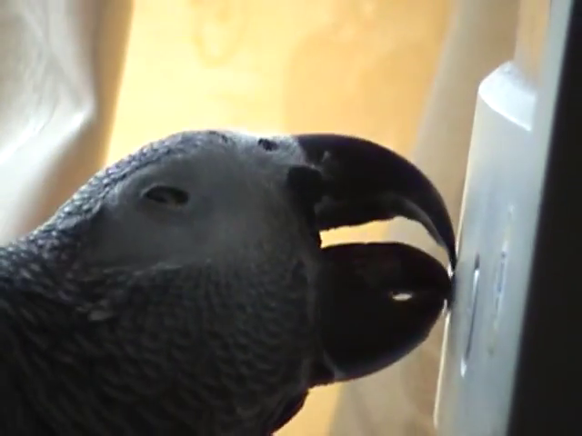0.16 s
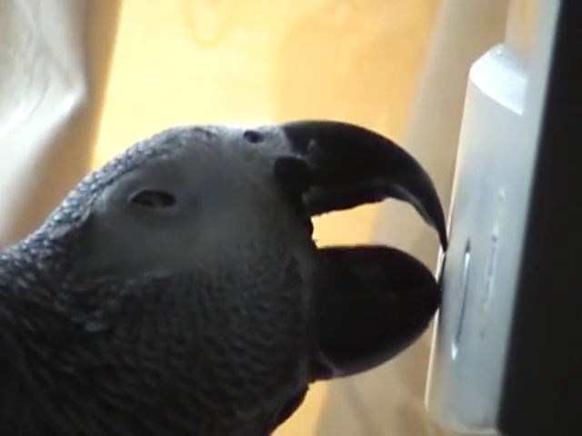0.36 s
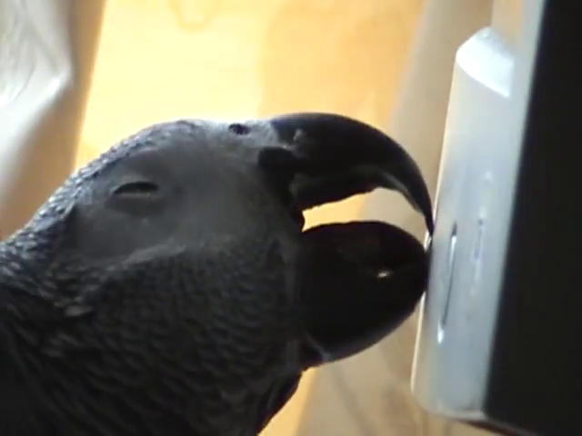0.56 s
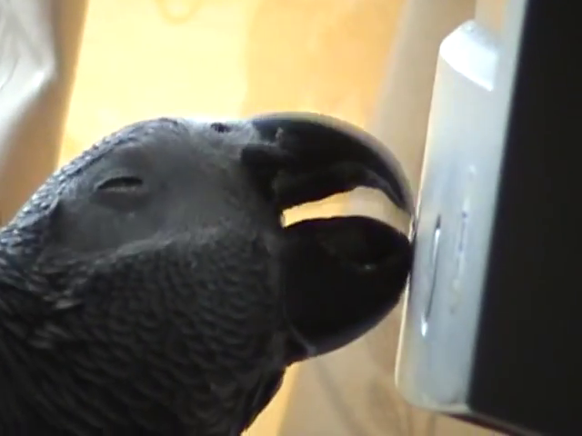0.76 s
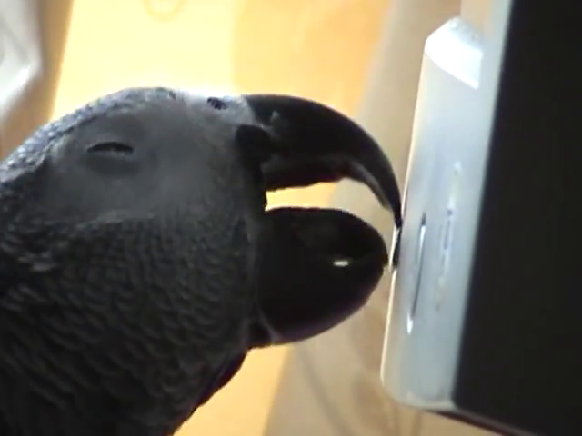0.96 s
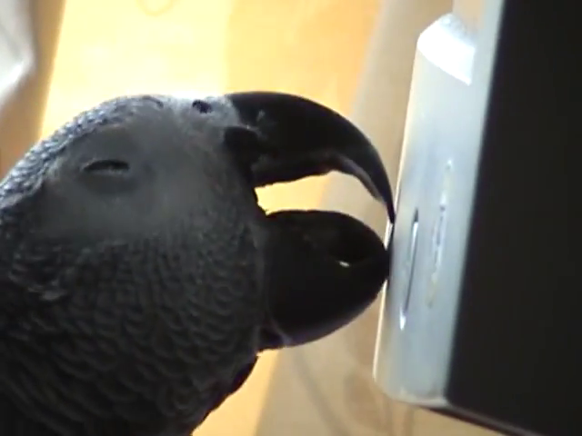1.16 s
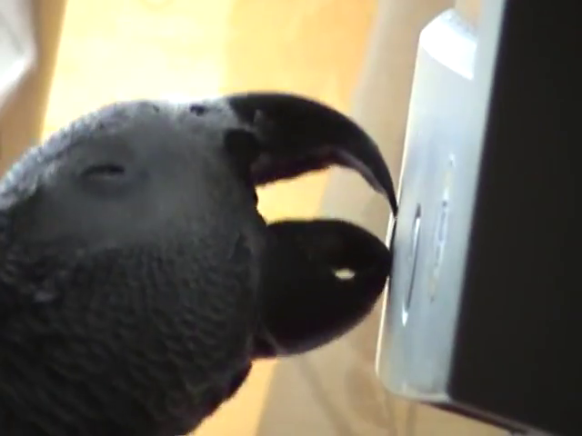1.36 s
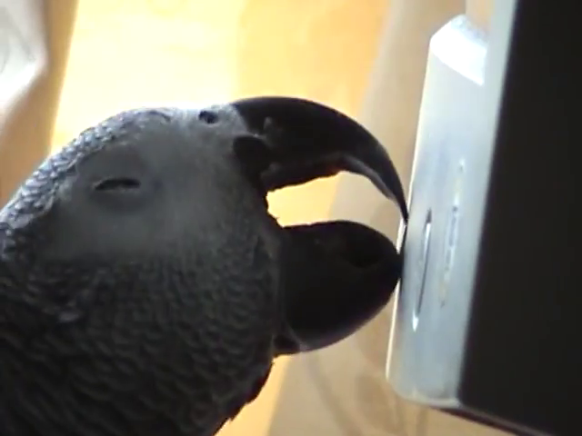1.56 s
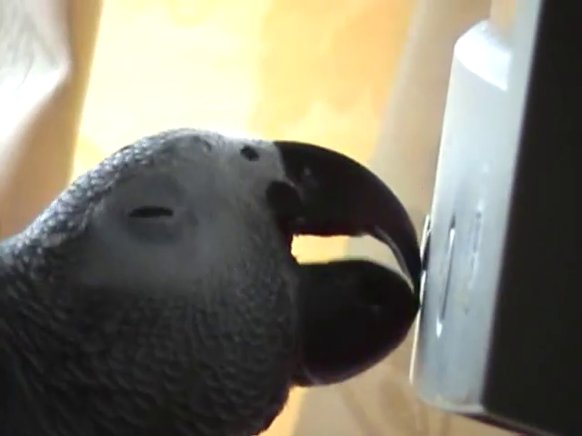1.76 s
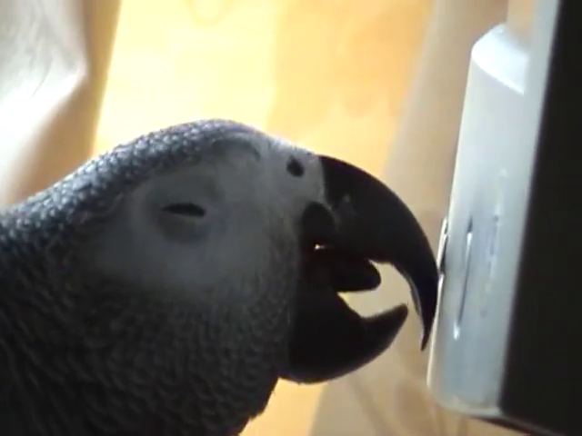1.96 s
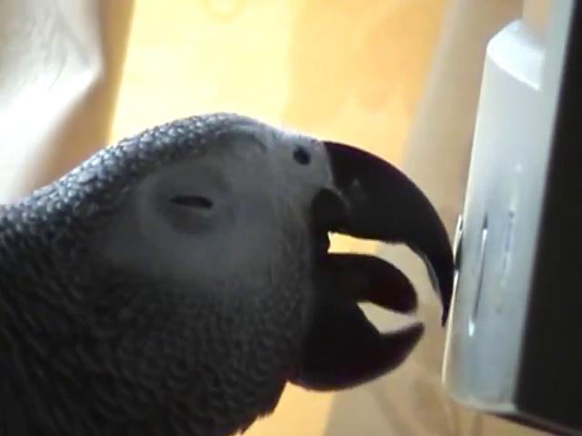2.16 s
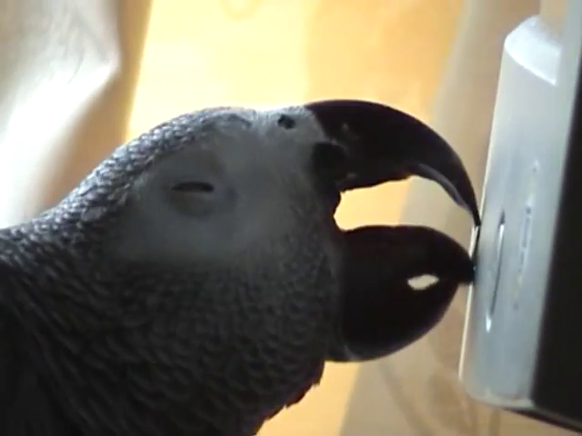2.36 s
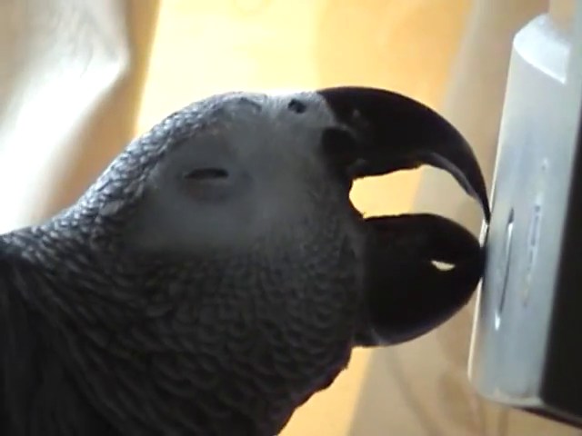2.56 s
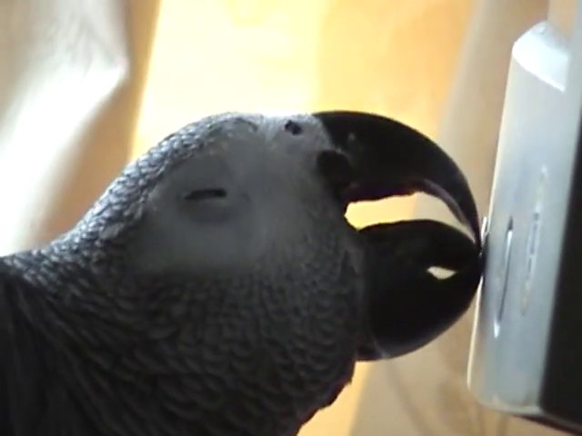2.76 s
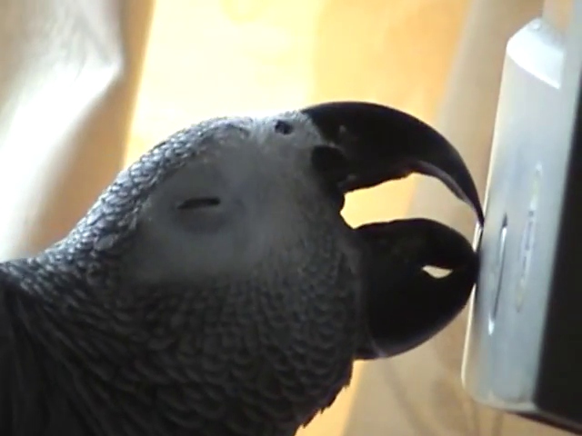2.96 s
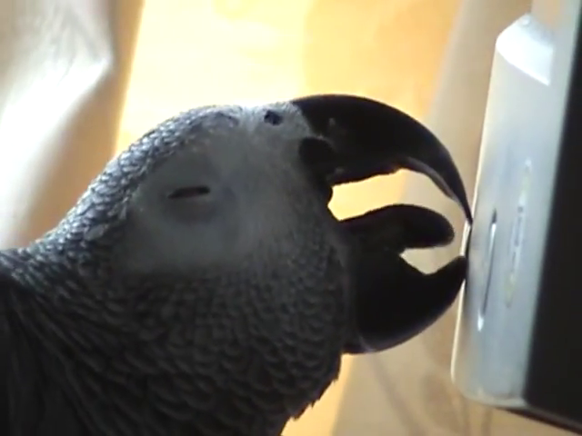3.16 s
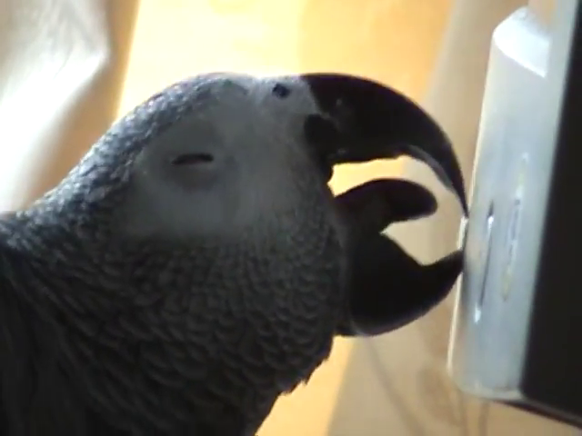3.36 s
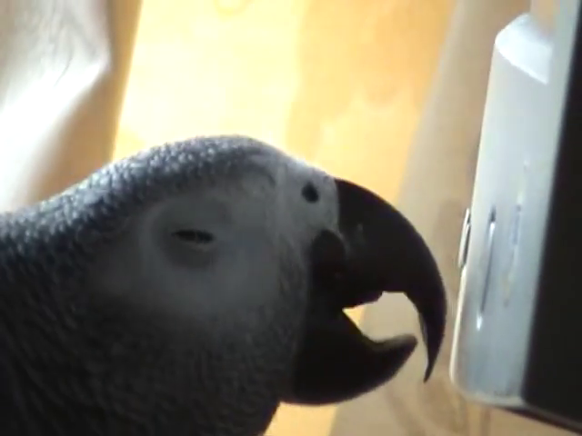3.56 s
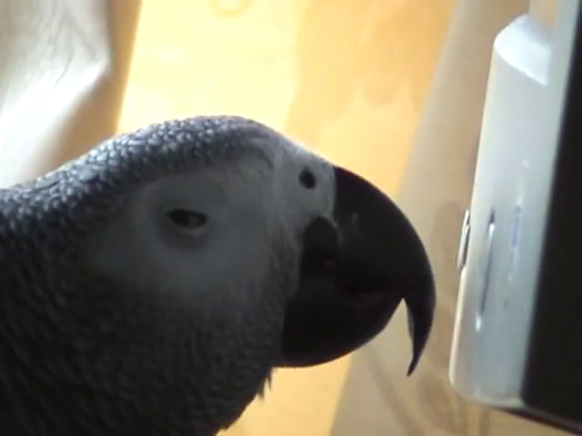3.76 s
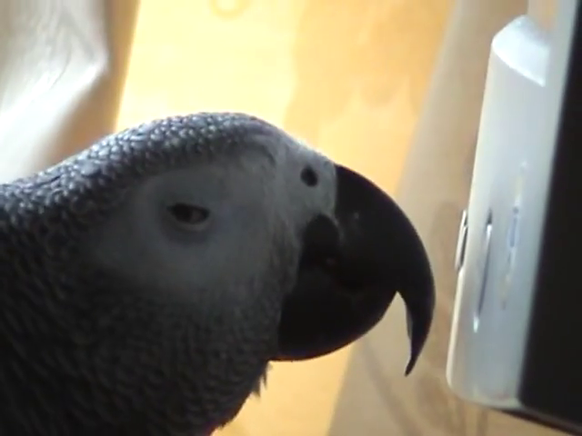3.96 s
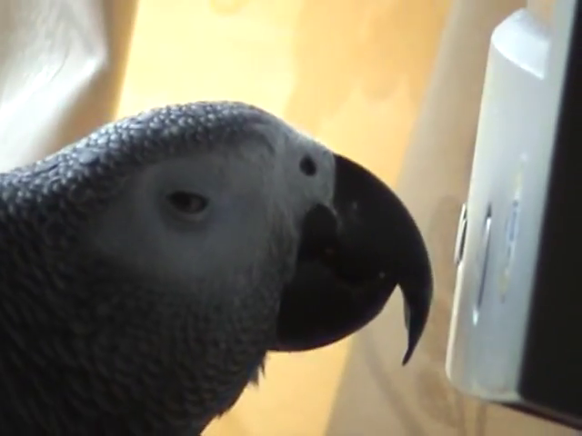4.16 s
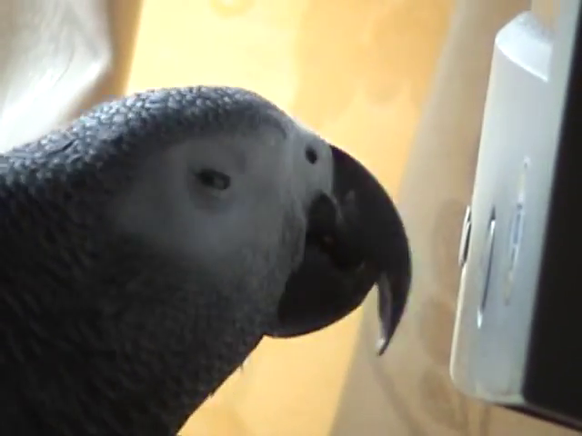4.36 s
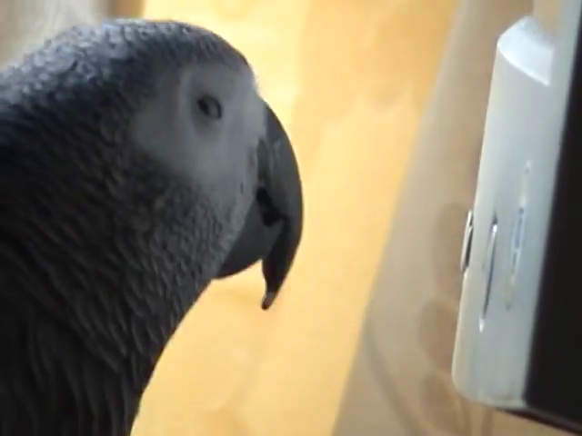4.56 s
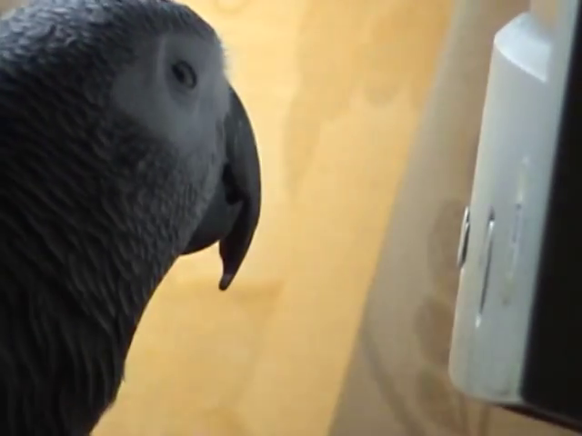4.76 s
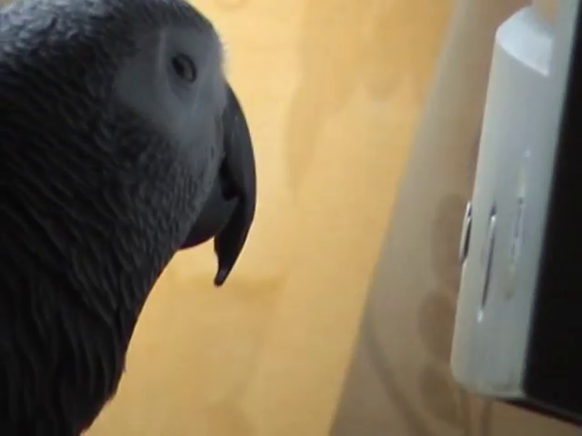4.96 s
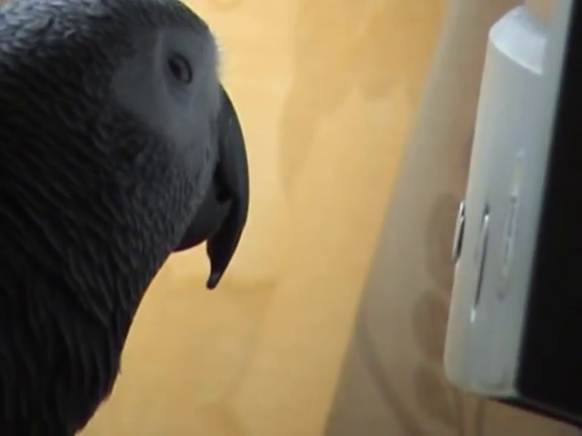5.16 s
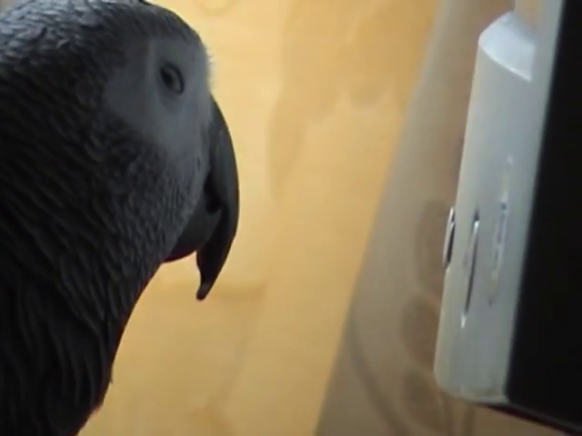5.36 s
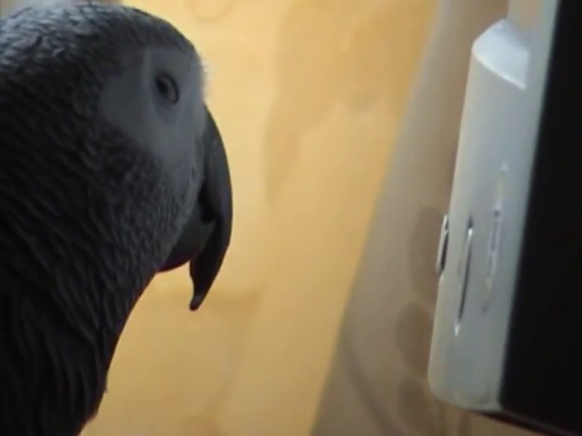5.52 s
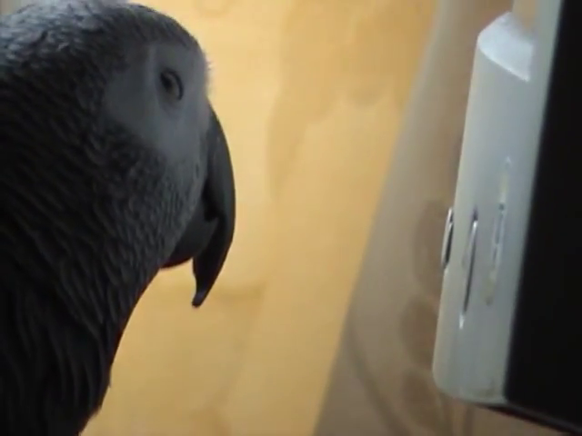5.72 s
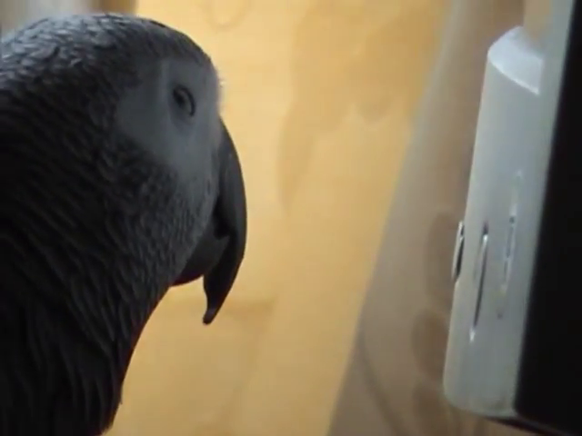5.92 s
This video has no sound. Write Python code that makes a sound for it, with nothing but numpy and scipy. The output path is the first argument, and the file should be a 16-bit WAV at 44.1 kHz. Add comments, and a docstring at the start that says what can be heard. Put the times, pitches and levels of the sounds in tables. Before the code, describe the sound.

Soft irregular beak taps and short rasping drags ring a hard plastic shell, broken by two sudden loud cracks, then faint hum and hiss.

```python
"""A small, bare room: a parrot works its beak against a hard plastic casing on the wall, near a stereo camera.
The tip drags, lets go and taps: runs of tiny slips and filtered noise bursts ring the modes of the hollow shell.
Two sharp snaps, broadband noise with a low thump as the camera overloads, fill the room and drive its limiter.
Behind them: humming sines, a faint once-a-second tick, a whirring motor in bursts, and the camera's hiss
and whine, all but the hum made of filtered noise."""
import sys
import numpy as np
from scipy import signal
from scipy.fft import rfft, irfft, next_fast_len
from scipy.io import wavfile
from scipy.ndimage import uniform_filter1d, map_coordinates

SR = 44100
rng = np.random.default_rng(int(sys.argv[2]) if len(sys.argv) > 2 else 0)


def dump(signal):
    """Clip the signal to [-1, 1] and save it as 16-bit WAV at the path in sys.argv[1]."""
    limited = np.clip(np.atleast_2d(signal).T, -1, 1)
    pcm = np.round(limited * 32767).astype(np.int16)
    wavfile.write(sys.argv[1], SR, pcm)


N = 264159  # samples in the scene
T = np.arange(SR * 2 // 5) / SR  # seconds within one hit


def amp(db):
    """Decibels to gain."""
    return 10 ** (np.asarray(db) / 20)


def rms(x):
    """Root mean square."""
    return np.sqrt(np.mean(x ** 2) + 1e-20)


def along(points, hz):
    """(Hz, value) points read on a log frequency axis."""
    point_hz, values = np.transpose(points)
    return np.interp(np.log(hz + 1), np.log(point_hz + 1), values)


def bumps(peaks, hz):
    """Decibels that (Hz, width in Hz, dB) resonances add to a spectrum."""
    return sum(db / (1 + (2 * (hz - centre) / width) ** 2) for centre, width, db in peaks)


def band(hz, centre_hz, width_hz):
    """Decibels of a steep-sided band."""
    return -20 * np.log10(1 + (2 * (hz - centre_hz) / width_hz) ** 4)


def filtered(x, response):
    """x times a gain that depends on frequency."""
    n = x.shape[-1]
    padded = next_fast_len(n + SR // 4)
    gain = response(np.fft.rfftfreq(padded, 1 / SR))
    return irfft(rfft(x, padded) * gain, padded)[..., :n]


def wobble(rate):
    """A smooth random curve over the scene, with rate knots a second."""
    knots = rng.standard_normal(int(N * rate / SR) + 4)
    return map_coordinates(knots, [np.arange(N) * rate / SR])


def span(start, length, ramp):
    """1 during a stretch of time in seconds, 0 outside it, with sloped ends."""
    t = np.arange(N) / SR - start
    return np.clip(np.minimum(t, length - t) / ramp, 0, 1)


def noise(colour_db, width, size):
    """Stereo noise of rms 1: independent mid and side signals share a colour, the side scaled by width."""
    white = rng.standard_normal((2, size))
    mid, side = filtered(white, lambda hz: amp([colour_db(hz), colour_db(hz) + along(width, hz)]))
    pair = np.array([mid + side, mid - side])
    return pair / rms(pair)


def add(track, s, sound):
    """Mix a sound into the track at s seconds."""
    start = max(round(s * SR), 0)
    part = track[:, start:][:, :sound.shape[-1]]
    part += sound[..., :part.shape[1]]


# The bare room's decay. Each row: frequency in Hz, time to fall by 60 dB in seconds.
ROOM_DECAY = [(150, 0.57), (400, 0.28), (1000, 0.27), (3000, 0.27), (7000, 0.22), (14000, 0.17)]
# Stereo spread of the sounds in the room. Each row: frequency in Hz, side relative to mid in dB.
ROOM_WIDTH = [(100, 2), (350, -27), (700, -17), (1400, -14), (4000, -10), (9000, -11.5), (14000, -5)]


def click(colour_db, direct_db, direct_t60, rise):
    """One impulse as the room returns it: a brief direct crack, then dense reflections whose treble dies first."""
    hz, t, bins = signal.stft(noise(colour_db, ROOM_WIDTH, len(T)), SR, nperseg=256)
    decay = amp(-60 * t / along(ROOM_DECAY, hz)[:, None])
    tail = signal.istft(bins * decay, SR, nperseg=256)[1][:, :len(T)]
    crack = amp(direct_db) * 10 ** (-3 * T / direct_t60)
    return tail * (1 + crack) * (1 - np.exp(-T / rise))


# Modes of beak and hollow casing. Each row: frequency in Hz, strength in dB before tilt and scatter.
SHELL_MODES = [(235, -17.5), (340, -12.5), (392, -10), (520, -8.5), (628, 5.5), (657, -3), (711, 2.5),
               (795, -12), (906, 1.5), (1131, -10.5), (1206, -4), (1268, -4), (1320, -0.5), (1432, -9),
               (1840, -3), (1951, -6.5), (2160, -17), (2385, -8), (2630, -7.5), (2728, -3.5), (3146, -3),
               (3417, -1.5), (3760, -2), (4180, -32.5), (6128, -9), (6885, -11.5), (7335, -14), (8270, -10),
               (9005, -21)]


def shell(bright_db, scatter_db, rise, t60=0.41, damping=0.25, knee_hz=630):
    """The modes ring, high ones more briefly; bright_db tilts each octave above the knee, and strengths scatter."""
    hz, db = np.transpose(SHELL_MODES)[:, :, None]
    life = t60 * np.maximum(hz / knee_hz, 1) ** -damping
    octaves = np.log2(np.maximum(hz / knee_hz, 1))
    size = amp(db + bright_db * octaves + scatter_db * rng.standard_normal(hz.shape))
    phase = 2 * np.pi * (hz * T + rng.random(hz.shape))
    ring = np.sum(size * np.sin(phase) * np.exp(-np.log(1000) * T / life), axis=0)
    return ring / np.linalg.norm(size) * (1 - np.exp(-T / rise))


def boom(main_hz=622.6, beat_hz=29.7, beat_peak_s=0.0041, twin_db=-3, t60=0.32, rise=0.0039):
    """The casing's main note under a slow push; a close twin mode beats with it, first in step at beat_peak_s."""
    phase = 2 * np.pi * (main_hz * T + rng.random())
    twin = amp(twin_db) * np.sin(phase + 2 * np.pi * beat_hz * (T - beat_peak_s))
    pair = (np.sin(phase) + twin) / np.hypot(1, amp(twin_db))
    return pair * 10 ** (-3 * T / t60) * (1 - np.exp(-T / rise))


# Colour of room air and hiss at the microphones. Each row: frequency in Hz, relative level in dB.
AIR_COLOUR = [(20, -8), (39, -17), (56, -4.5), (80, -2), (108, -15), (155, -4.5), (200, -10.5), (600, -12),
              (850, -15.5), (1400, -22), (2000, -23.5), (2500, -27.5), (5700, -31), (14000, -35.5)]
# Stereo spread of that air. Each row: frequency in Hz, side relative to mid in dB.
AIR_SPREAD = [(60, -11.5), (110, -5.5), (200, -3), (380, -3), (690, -4), (1270, -0.5), (2350, 0),
              (4320, -1.5), (7960, -5.5), (14700, 5.5)]
# The camera's whine. Each row: centre in Hz, width in Hz, boost over the air in dB.
CAMERA_WHINE = [(2024, 33, 5.5), (3328, 146, 9.5), (5030, 36, 13.5)]
# Household hum. Each row: frequency in Hz, level in dB before the overall hum trim.
HUM_TONES = [(53.8, -49.5), (150.7, -56), (220.7, -59), (441.4, -57.5), (549.1, -62.5), (635.2, -56.5)]


def background(air_db=-44.5, hum_trim_db=-1, drift_rad=0.79, hiss_top_hz=14400):
    """Room air, hiss and camera whine as coloured noise, over hum sines that waver in level and phase."""
    air = noise(lambda hz: along(AIR_COLOUR, hz) + bumps(CAMERA_WHINE, hz), AIR_SPREAD, N)
    air = filtered(air, lambda hz: hz < hiss_top_hz)
    t = np.arange(N) / SR
    hum = np.zeros(N)
    for hz, db in HUM_TONES:
        level = amp(db + 1.8 * wobble(12.0))
        hum += level * np.sin(2 * np.pi * hz * t + drift_rad * wobble(7.9))
    return amp(air_db) * air + amp(hum_trim_db) * hum


# Beak tip on the casing. Each row: tap time in seconds, reference level in dB, shell ring relative to that in dB,
# tip tick relative to that in dB, both before trims, length of the drag before the tap in seconds.
BEAK_TAPS = [(0.0764, -38.5, 8.5, -13, 0.057), (0.169, -38, -4, -18, 0.024), (0.5014, -45, 14.5, -14, .17),
             (0.829, -25.5, -26, -20, 0.028), (0.8659, -20, -6, -12.5, 0), (0.903, -35.5, 14.5, -18, 0),
             (0.9975, -31.5, -3.5, -8.5, 0), (1.1844, -44, 12.5, -22, 0.05),
             (1.287, -28.5, 1.5, -12.5, .06), (1.3476, -34, -1, -24, 0.015), (1.4311, -31.5, -28, -10.5, 0),
             (1.5414, -36.5, 4, -15, 0.036), (2.374, -29.5, 1.5, -25, 0.048),
             (2.5754, -36, -17, -13, 0.053), (2.6655, -32, 6, -31, 0), (2.9438, -29.5, 0, -26, 0.075)]
# Colour of beak on plastic, dragging or tapping. Each row: frequency in Hz, relative level in dB.
CLACK_COLOUR = [(100, -19), (280, -14), (420, 3.5), (900, 3), (1300, -2), (1600, 0), (2200, -2),
                (2900, -13), (4000, -10.5), (5500, -26.5), (12000, -40)]


def rubs(slips_per_s=160, uneven_db=4, ring_db=-1, boom_db=5, ramp=0.019):
    """Dragging is a dense run of tiny slips, each sounding the same casing; pressure builds toward the tap."""
    drag_db, grows_db_per_s = -41, 10
    t = np.arange(N) / SR
    pressure = np.zeros(N)
    for s, *_, drag_s in BEAK_TAPS:
        build = amp(drag_db - grows_db_per_s * np.clip(s - t, 0, drag_s))
        pressure += build * span(s - drag_s, drag_s, ramp)
    slips = (rng.random(N) < slips_per_s / SR) * amp(uneven_db * rng.standard_normal(N))
    scratch = click(lambda hz: along(CLACK_COLOUR, hz), direct_db=-12, direct_t60=0.03, rise=0.002)
    ring = shell(bright_db=-4, scatter_db=1, rise=0.002)
    body = scratch + amp(ring_db) * ring + amp(boom_db) * boom()
    body = body / np.linalg.norm(body[0])
    force = pressure * slips / rms(slips)
    return signal.fftconvolve(force[None], body, axes=1)[:, :N]


# Colour of the hard tip's tick. Each row: frequency in Hz, relative level in dB.
TICK_COLOUR = [(2500, -22), (5000, 4), (7000, -1), (10500, -2), (14000, -19)]


def taps(clack_db=-6, touch_db=-8, ring_db=-7, boom_db=-3, tick_db=-6):
    """The tip slips on the plastic: a hard touch and its rebound, with a slower push that rings the casing."""
    rebound_s, rebound_db = 0.013, -6
    out = np.zeros((2, N))
    for s, db, ring_rel, tick_rel, _ in BEAK_TAPS:
        for delay, loss_db in [(0, 0), (rebound_s, rebound_db)]:
            clack = click(lambda hz: along(CLACK_COLOUR, hz), direct_db=-12, direct_t60=0.015, rise=0.001)
            touch = shell(bright_db=-1.0, scatter_db=4.5, rise=0.0015, t60=0.28)
            tick = click(lambda hz: along(TICK_COLOUR, hz), direct_db=-1.0, direct_t60=0.018, rise=0.001)
            contact = amp(clack_db) * clack + amp(touch_db) * touch + amp(tick_db + tick_rel) * tick
            add(out, s + delay, amp(db + loss_db) * contact)
        ring = amp(ring_db) * shell(bright_db=-7.5, scatter_db=7.5, rise=0.0047, t60=0.3)
        add(out, s, amp(db + ring_rel) * (ring + amp(boom_db) * boom()))
    return out


# The beats on which the motor runs. Each entry: beat number, counted from 0.
MOTOR_BEATS = [0, 1, 7, 8, 11, 14, 17, 20, 24, 30, 32, 35, 39, 40, 45]


def focus(centre_hz=4930, width_hz=240, db=-62.0, start_s=0.24, beat_s=0.127):
    """A tiny motor, likely the lens focusing, whirrs as narrow-band noise on chosen beats of a fixed grid."""
    beat = np.floor((np.arange(N) / SR - start_s) / beat_s)
    running = uniform_filter1d(np.isin(beat, MOTOR_BEATS).astype(float), size=512)  # softened edges
    return amp(db) * running * noise(lambda hz: band(hz, centre_hz, width_hz), ROOM_WIDTH, N)


def clock(first=0.63, tone_hz=825, width_hz=110, db=-50, t60=0.99):
    """A far, dull tick once a second, like a clock in the next room: narrow noise with a soft onset."""
    out = np.zeros((2, N))
    envelope = 10 ** (-3 * T / t60) * (1 - np.exp(-T / 0.015))
    for s in np.arange(first, N / SR):
        tone = noise(lambda hz: -20 * np.log10(1 + (2 * (hz - tone_hz) / width_hz) ** 2), ROOM_WIDTH, len(T))
        add(out, s, amp(db) * tone * envelope)
    return out


# Hard snaps of the beak. Each row: start in seconds, level in dB before the limiter, brightness in dB per octave,
# ring relative to the snap in dB, low overload thump relative to the snap in dB, beak cavity in Hz.
BEAK_SNAPS = [(1.7940, -0.5, -0.2, -2.5, -8.5, 1320), (3.4440, 3.5, 2.5, -3.5, -4, 3400)]
# Colour of a snap. Each row: frequency in Hz, relative level in dB before cavity and brightness.
SNAP_COLOUR = [(60, -36), (180, -30), (300, -20.5), (400, -6), (550, -1), (700, 5), (1000, -2), (1400, -3),
               (2200, -5.5), (4200, -8), (5200, -8), (9500, -6.5), (12000, -14.5), (15000, -20.5)]


def snaps(pivot_hz=2000, thump_s=0.007, cavity_db=5, cavity_share=0.16):
    """A hard snap excites a broad range, coloured by the open beak, with one low thump of the overloaded camera."""
    out = np.zeros((2, N))
    u = T / thump_s
    thump = (1 - u / 2) * u * np.exp(-u)  # swings out, then back past zero
    for s, db, bright, ring_db, thump_db, cavity_hz in BEAK_SNAPS:
        cavity = [(cavity_hz, cavity_share * cavity_hz, cavity_db)]
        # brightness tips the two octaves around the pivot
        shelf = lambda hz: bright * np.clip(np.log2((hz + 1) / pivot_hz), -1, 1)
        colour = lambda hz: along(SNAP_COLOUR, hz) + bumps(cavity, hz) + shelf(hz)
        crack = click(colour, direct_db=-20.0, direct_t60=0.027, rise=0.00073)
        ring = shell(bright_db=bright, scatter_db=1.5, rise=0.008, t60=0.3)
        add(out, s, amp(db) * (crack + amp(ring_db) * ring + amp(thump_db) * thump))
    return out


def thin_tick(s=2.5755, centre_hz=7200, width_hz=1900, db=-47):
    """Once the very tip flicks off an edge: a thin, high band of noise that dies in the room."""
    out = np.zeros((2, N))
    tick = click(lambda hz: band(hz, centre_hz, width_hz), direct_db=0, direct_t60=0.03, rise=0.001)
    add(out, s, amp(db) * tick)
    return out


def scene(lean_db=0.5):
    """Everything mixed in stereo; the background leans a little to the right."""
    parrot = taps() + rubs() + thin_tick() + snaps()
    return parrot + clock() + focus() + background() * amp([[-lean_db], [lean_db]])


def record(dry, limit_db=-7, response_s=0.0013, clip_level=0.9, top_hz=15250):
    """The camera's quick limiter holds the snaps down; what slips past clips softly, then the top is cut."""
    keep = np.exp(-1 / (response_s * SR))
    power = signal.lfilter([1 - keep], [1, -keep], np.mean(dry ** 2, axis=0))
    held = dry / np.sqrt(np.hypot(1, power / amp(limit_db) ** 2))
    clipped = held / (1 + (held / clip_level) ** 6) ** (1 / 6)
    return filtered(clipped, lambda hz: 1 / (1 + (hz / top_hz) ** 150))


dry = scene()
out = record(dry)
dump(out)
```